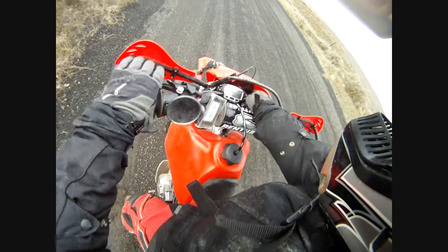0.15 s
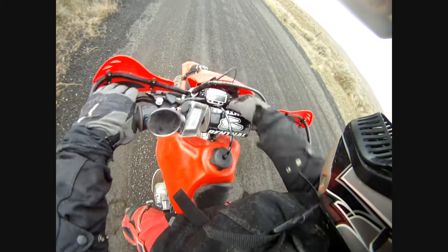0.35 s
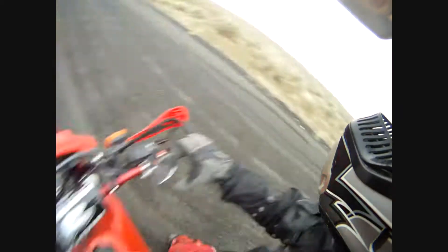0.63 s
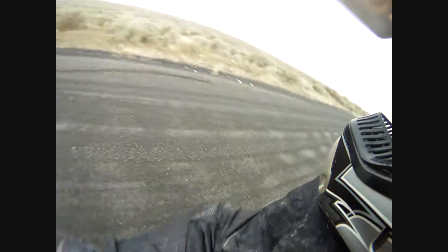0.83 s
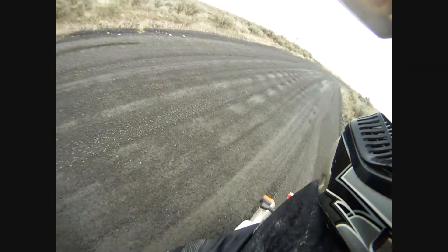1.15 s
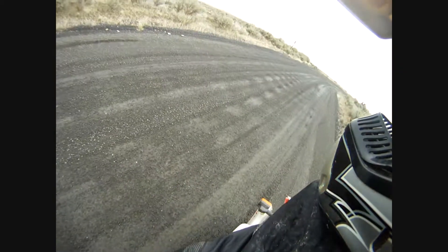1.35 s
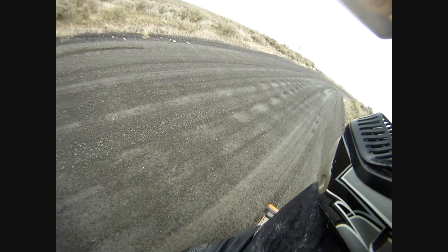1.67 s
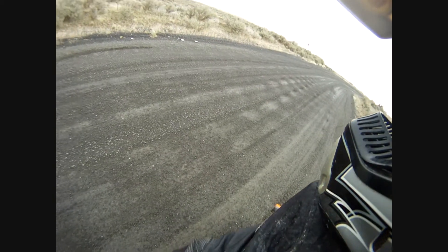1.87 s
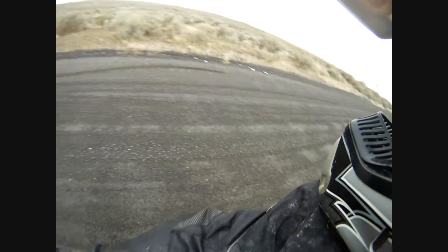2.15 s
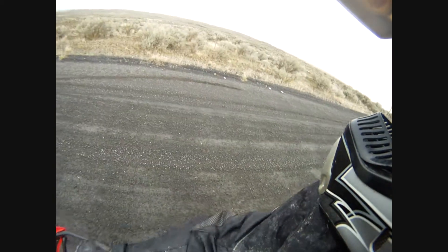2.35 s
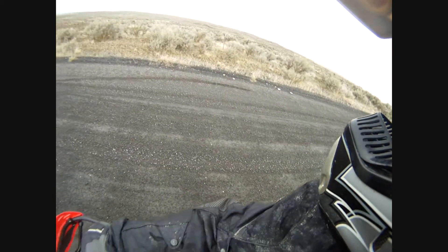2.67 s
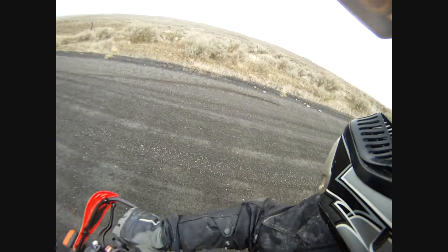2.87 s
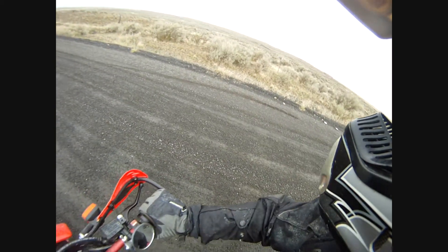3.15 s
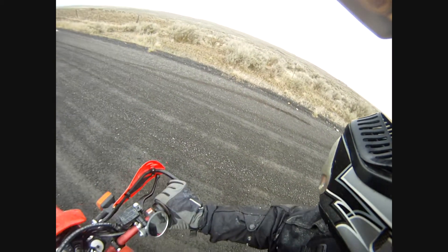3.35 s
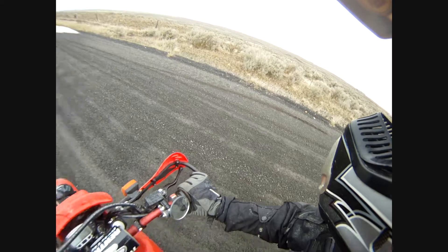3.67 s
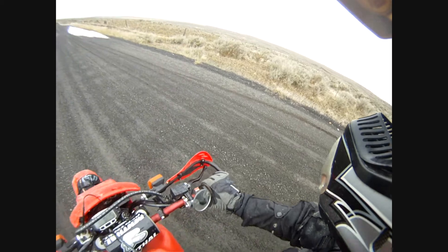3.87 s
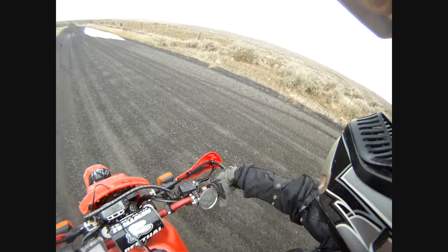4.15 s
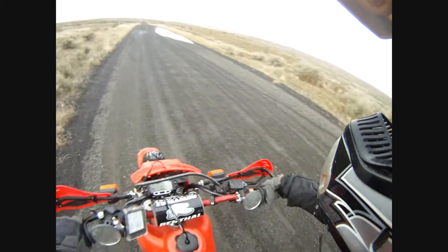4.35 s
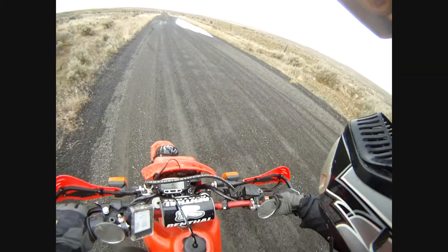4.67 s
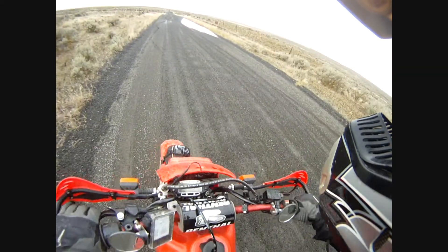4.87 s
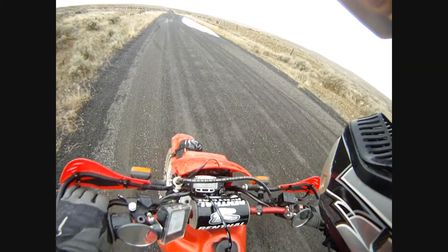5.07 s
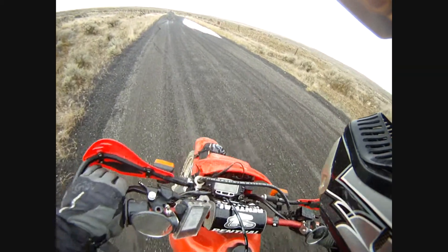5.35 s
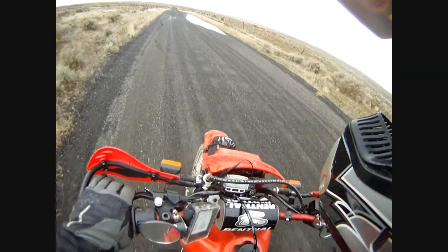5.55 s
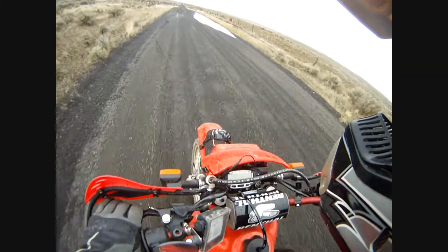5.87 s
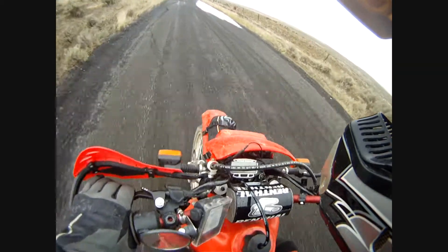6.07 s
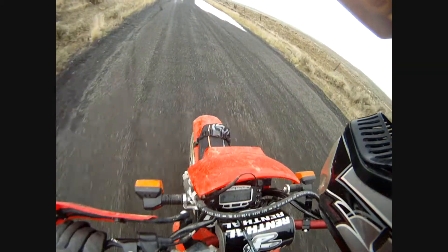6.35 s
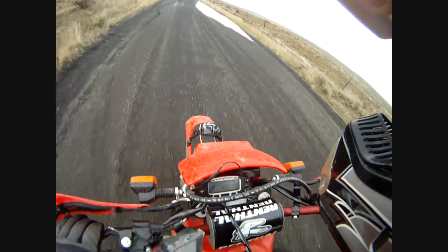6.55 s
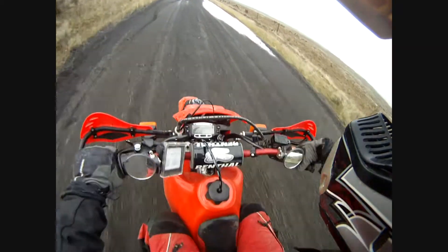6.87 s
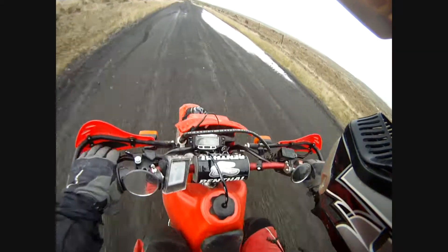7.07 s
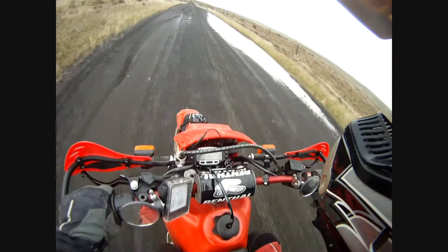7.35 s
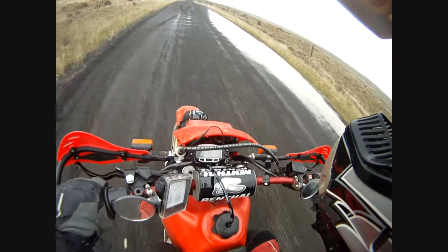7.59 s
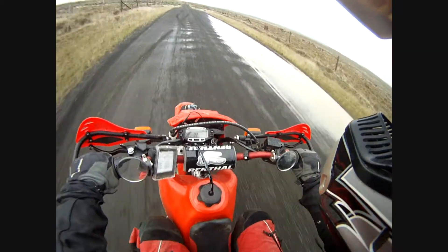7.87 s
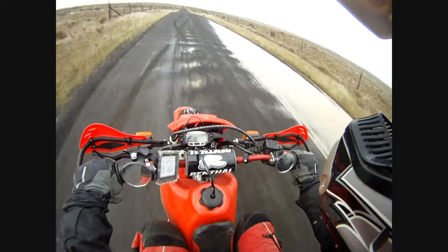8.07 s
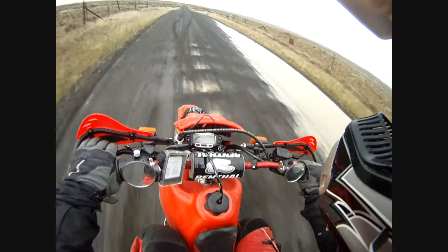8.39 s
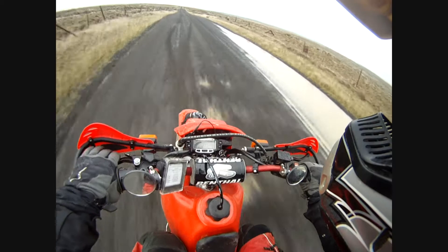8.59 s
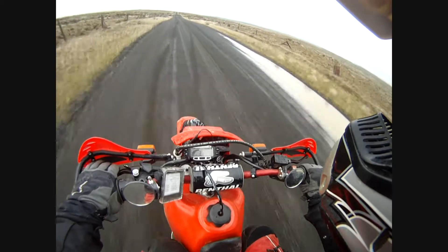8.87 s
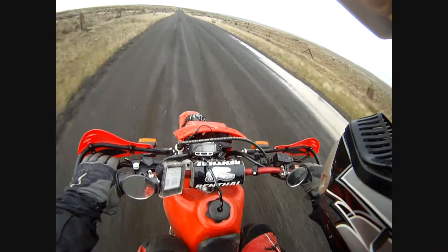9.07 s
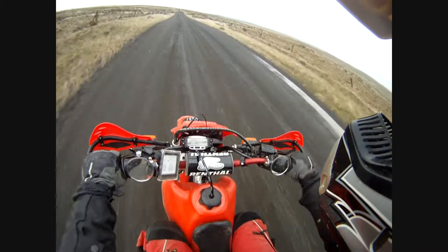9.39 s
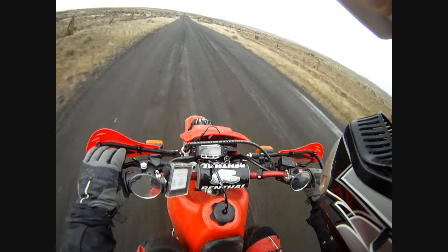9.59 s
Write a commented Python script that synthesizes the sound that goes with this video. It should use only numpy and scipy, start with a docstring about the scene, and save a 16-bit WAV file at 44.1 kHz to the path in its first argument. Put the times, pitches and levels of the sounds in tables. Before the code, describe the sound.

Clothing rustles and wind buffets until a single-cylinder motorcycle engine catches, sputters and pulls away, shifting up twice.

```python
"""A single-cylinder four-stroke dirt bike on a gravel road, close up from a camera on the rider's helmet.
It coasts with a dead engine: wind buffets the microphone's case, the rider's gear rustles and knocks.
Near 4 s the engine catches and sputters, then pulls away and changes up twice as the tyres begin to roar.
Each cycle gives an exhaust thump that barks under throttle, a gulp of intake air and a rush of gas,
over a steady clatter."""
import sys
import numpy as np
from scipy import signal
from scipy.fft import rfft, irfft, next_fast_len
from scipy.io import wavfile
from scipy.ndimage import uniform_filter1d

SR = 44100
rng = np.random.default_rng(int(sys.argv[2]) if len(sys.argv) > 2 else 0)


def int16_out(signal):
    """Quantize to a 16-bit WAV file."""
    q = np.round(np.clip(np.atleast_2d(signal).T, -1, 1) * 32767)
    wavfile.write(sys.argv[1], SR, q.astype(np.int16))


N = 429093
TIME = np.arange(N) / SR

# speed of the running engine: time_s, firing_hz
FIRING_RATE = [(5.0084, 21.47), (5.2, 26.97), (5.49, 27.35), (5.69, 26.45), (6.25, 32.31), (6.42, 37.59),
               (6.77, 56.7), (6.88, 47.23), (7.14, 39.06), (7.19, 34.0), (7.3, 32.36), (7.72, 43.57),
               (8.39, 50.27), (8.87, 52.42), (9.05, 55.49), (9.33, 53.95), (9.4, 49.18), (9.73, 45.99)]
# short dying runs as the engine catches: start_s, end_s, firing_hz, first_level_db, loss_per_firing_db
CATCHES = [(3.929, 3.96, 14, -34.5, 2), (4.0195, 4.14, 19.4, -17.5, 2.0), (4.169, 4.45, 19.9, -28.5, 1.9),
           (4.491, 4.72, 15, -35, 0), (4.797, 4.99, 23.6, -15.5, 3.2)]
# sleeve strokes with a gliding pitch: start_s, length_s, level_db, start_hz, end_hz
SWISHES = [(0.481, 0.019, -56.5, 1900, 2040), (1.324, 0.081, -58, 2290, 2900),
           (1.604, 0.074, -51, 2410, 2890), (1.768, 0.072, -48.5, 3070, 2040),
           (2.531, 0.059, -44.5, 1930, 1500), (3.287, 0.1183, -54, 1297, 1397),
           (3.41, 0.209, -51.5, 1398, 1517), (3.649, 0.099, -51, 1450, 1484),
           (3.82, 0.099, -48.5, 1590, 1305)]
# midrange spectrum of gas, clatter and tyres: frequency_hz, level_db
RUSH_SPECTRUM = [(100, -8.5), (350, -1.5), (700, -8.5), (1100, -2), (2000, -2.5), (2700, -3), (4000, -15.5),
                 (5500, -9), (8000, -15.5)]
# spectrum of hiss at the camera case: frequency_hz, level_db
HISS_SPECTRUM = [(1500, -27), (3500, -5), (5000, 1), (7500, -43), (9000, 25), (11000, 19), (13500, -58),
                 (15500, -21)]


def firings():
    """Times in seconds at which the running engine completes a cycle."""
    time_s, firing_hz = np.transpose(FIRING_RATE)
    running_s = TIME[TIME >= time_s[0]]
    cycles = np.cumsum(np.interp(running_s, time_s, firing_hz)) / SR
    return np.interp(np.arange(int(cycles[-1]) + 1), cycles, running_s)


def octaves_over_cruise(cruise_hz=50):
    """Engine speed from the first catch on, in doublings of the cruising firing rate."""
    speed = [(start, rate) for start, _, rate, _, _ in CATCHES] + list(FIRING_RATE)
    return np.log2(curve(speed) / cruise_hz)


def engine_gain(law, throttle):
    """Each part of the engine's sound grows with speed and load."""
    cruise_db, per_octave_db, shut_loss_db = law
    return from_db(cruise_db + per_octave_db * octaves_over_cruise() - shut_loss_db * (1 - throttle))


def pipe(x, echo_db, round_trip_s=0.00337):
    """Whatever leaves the exhaust comes again after one round trip in the pipe."""
    return x + from_db(echo_db) * np.interp(TIME - round_trip_s, TIME, x, left=0)


def thump(pulses, low_hz=120, top_hz=640):
    """The blow-down of the cylinder rings the silencer."""
    # silencer resonances: pitch_hz, gain_db, t60_s
    silencer_modes = [(204, 8, 0.012), (292.5, 13.5, 0.021), (390, -12, 0.065), (467, -2, 0.097)]
    ringing = ring(pipe(pulses, echo_db=-4.5), silencer_modes)
    return -cut(cut(ringing, top_hz, "low", order=4), low_hz, "high")


def exhaust_and_intake(fired, throttle, uneven_db=1.3, gulp_lag_s=0.007734, valve_open_s=0.00406):
    """A gulp follows each exhaust thump: the intake valve rings the airbox as it opens and shuts."""
    # airbox resonances: pitch_hz, gain_db, t60_s
    airbox_modes = [(252, -5.5, 0.066), (326, -2.5, 0.025), (520, -15.5, 0.033)]
    # strength of thump and gulp together: cruise_db, per_octave_db, shut_loss_db
    thump_law = (-21, 6.1, 5.2)
    period_s = 1 / np.interp(fired, *np.transpose(FIRING_RATE))
    thump_sizes, gulp_sizes = from_db(-uneven_db * rng.standard_normal((len(fired), 2))).T
    exhaust = levelled(thump(clicks(fired, thump_sizes)))
    opens_s = fired + gulp_lag_s + 0.2076 * period_s
    gulps = clicks(opens_s, gulp_sizes) + clicks(opens_s + valve_open_s, from_db(-6) * gulp_sizes)
    intake = levelled(cut(cut(ring(gulps, airbox_modes), 660, "low"), 106, "high"))
    return engine_gain(thump_law, throttle) * levelled(exhaust + from_db(-2) * throttle ** 1.9 * intake)


def bark_and_puff(fired, throttle, lag_s=0.0008, jitter_s=0.00003, uneven_db=0.32):
    """Under load the exhaust pulse steepens to a crack; a puff of gas follows it down the pipe."""
    # exhaust resonances rung by the crack: pitch_hz, gain_db, t60_s
    bark_modes = [(460, 3.5, 0.054), (835, -13.5, 0.075), (1102, 4.5, 0.023), (1140, 0, 0.017),
                  (1546, -1, 0.016), (1780, -30, 0.006), (1894, 1, 0.018), (2480, -27, 0.028)]
    # strength of the bark and of the puff: cruise_db, per_octave_db, shut_loss_db
    bark_law = (-20.5, 8, 30.3)
    puff_law = (-25.5, 7, 20.4)
    timing, strength = rng.standard_normal((len(fired), 2)).T
    fronts = clicks(fired + lag_s + jitter_s * timing, from_db(uneven_db * strength))
    bark = levelled(-cut(ring(pipe(fronts, echo_db=5), bark_modes), 184, "high"))
    gas_flow = cut(fade(fronts, t60_s=0.079), 500, "low")
    puff = levelled(pipe(gas_flow * noise(RUSH_SPECTRUM), echo_db=-5.5))
    return engine_gain(bark_law, throttle) * bark + engine_gain(puff_law, throttle) * puff


def crank(fired, throttle, lag_s=0.0035):
    """The piston pumps the air once a crank turn, twice a cycle."""
    # strength of the hum: cruise_db, per_octave_db, shut_loss_db
    crank_law = (-31, 8.5, 17.6)
    firing_hz = curve(FIRING_RATE)
    running = TIME >= fired[0]
    cycle_angle = 2 * np.pi * (np.cumsum(firing_hz * running) / SR - firing_hz * lag_s)
    hum = np.cos(2 * cycle_angle) + from_db(-12) * np.cos(cycle_angle)
    return running * np.sqrt(2) * hum * engine_gain(crank_law, throttle)


def sputter(pop_db=-3.5, chug_db=-10, spit_db=-14):
    """Lone firings as the engine catches; the whole pipe chugs low, and the strong ones spit gas."""
    # low pipe resonances: pitch_hz, gain_db, t60_s
    chug_modes = [(86.7, -1, 0.13), (138, -6, 0.046), (229, -0.5, 0.084), (290, 2, 0.16)]
    fired, level_db = np.transpose([(at, first_db - k * loss_db)
                                    for start, end, rate, first_db, loss_db in CATCHES
                                    for k, at in enumerate(np.arange(start, end, 1 / rate))])
    relative_db = level_db - level_db.max()
    thump_peak = np.abs(thump(clicks([0], [1.]))).max()
    pops = thump(clicks(fired, from_db(level_db)), low_hz=113, top_hz=450) / thump_peak
    pushes = clicks(fired, from_db(level_db.max() + 0.46 * relative_db))
    chug = cut(cut(ring(pushes, chug_modes), 440, "low"), 63, "high")
    spurts = clicks(fired, from_db(level_db + 0.94 * relative_db))
    spit = cut(fade(spurts, t60_s=0.099), 140, "low") * noise(RUSH_SPECTRUM)
    return from_db(pop_db) * pops - from_db(chug_db) * chug + from_db(spit_db) * spit


def clatter_and_tyres():
    """One fluttering rush carries the engine's ringing metal and the roar of tyres on wet gravel."""
    # tyre roar as the bike gathers speed: time_s, level_db
    tyre_roar = [(3.9, -55), (6.0, -47), (7.2, -44), (8.3, -32.5), (9.73, -26.5)]
    casing = levelled(ring(rng.standard_normal(N), [(1466, -4.5, 0.031), (1870, 3.5, 0.021)]))
    rush = levelled(noise(RUSH_SPECTRUM) + from_db(-19) * noise(HISS_SPECTRUM) + from_db(-5) * casing)
    flutter = from_db(1.54 * drift(rate_hz=100))
    clatter_db = -28.5 + 18 * octaves_over_cruise()  # follows engine speed, whatever the load
    return np.hypot(from_db(clatter_db), from_db(curve(tyre_roar))) * rush * flutter


def wind(rumble_db=-2.5, buffet_db=-13, gust_db=-1.5):
    """A lumpy rumble on the microphone's case, with higher buffeting that jumps in the gusts."""
    # airflow over the case: time_s, level_db
    airflow = [(0, -48), (.6, -51.5), (.8, -44), (2.05, -47.5), (2.23, -35), (2.45, -51), (3.15, -49),
               (3.3, -63), (4.3, -41.5), (5.5, -45.5), (7.0, -37), (9.73, -36)]
    # gusts on the case, plus the low thud under the knocks at 1.87 s and 2.17 s: start_s, length_s, level_db
    gusts = [(0.052, 0.063, -47), (0.815, .1, -51), (0.993, 0.174, -45.5), (1.21, 0.11, -50),
             (1.478, .14, -56), (1.722, 0.071, -50), (1.866, 0.022, -35), (1.958, 0.067, -46.5),
             (2.167, 0.027, -35.5), (2.24, 0.096, -46), (2.405, 0.044, -51)]
    # spectra of the rumble and the buffeting: frequency_hz, level_db
    rumble_spectrum = [(12, 3.5), (28, -2), (42, 2.5), (70, -19), (150, -25), (400, -29)]
    buffet_spectrum = [(30, -49), (65, 4.5), (110, -5.5), (200, -10.5), (400, -20), (900, -24)]
    flow = from_db(curve(airflow) - drift(rate_hz=2.4))
    buffeting = np.hypot(from_db(buffet_db) * flow, from_db(gust_db) * swells(gusts))
    return from_db(rumble_db) * flow * noise(rumble_spectrum) + buffeting * noise(buffet_spectrum)


def gear_knocks(gain_db=-7):
    """Knocks ring the helmet shell under the microphone; ticks and scuffs are short bright bursts."""
    # dull knocks on the helmet: start_s, level_db
    knocks = [(0.068, -28), (.652, -22.5), (1.874, -44), (2.18, -37), (2.291, -30)]
    # shell resonances: pitch_hz, gain_db, t60_s
    helmet_modes = [(130, -6, 0.062), (229, -7, 0.034), (417, -4.5, 0.097), (865, -7, 0.034),
                    (1230, 3, 0.011), (1870, -9, 0.019)]
    # ticks and scuffs of the rider's gear: start_s, level_db, t60_s
    ticks = [(0.652, -33, 0.0093), (.731, -15, 0.017), (2.538, -31, 0.06), (2.995, -47, 0.066),
             (4.629, -32.5, 0.069)]
    # their spectrum: frequency_hz, level_db
    tick_spectrum = [(500, -43), (1200, 17.5), (2400, 0), (3600, 7.5), (5500, 3), (8500, 3), (15000, -45)]
    start_s, level_db = np.transpose(knocks)
    shell = ring(clicks(start_s, from_db(level_db)), helmet_modes)
    bursts = sum(fade(clicks([at], [from_db(db)]), t60_s) for at, db, t60_s in ticks)
    return from_db(gain_db) * (shell + bursts * noise(tick_spectrum))


def clothing_rustle():
    """Rubbing on the case sounds hollow, sleeves hiss; a faint rustle of both goes on between strokes."""
    # steady rustle of air and clothing: time_s, level_db
    rustle = [(0, -57), (.35, -59.5), (.75, -60), (.9, -57), (1.9, -52.5), (2.45, -54.5), (2.7, -61),
              (3.2, -63.5), (3.9, -56)]
    # clothing rubs on the case: start_s, length_s, level_db
    rubs = [(0.103, 0.062, -37), (0.18, 0.053, -51.5), (1.071, 0.087, -47), (1.216, .07, -51.5),
            (2.05, 0.27, -50.5)]
    # resonances of the rubbed case: pitch_hz, gain_db, t60_s
    case_modes = [(134, -4, 0.062), (439, -17, 0.52), (810, -28.5, 0.13), (1037, -13, 0.21),
                  (1213, 4.5, 0.017), (1710, 0.5, 0.012), (2104, 3, 0.0088), (3550, 1.5, 0.0094)]
    # spectrum of sliding cloth: frequency_hz, level_db
    cloth_spectrum = [(120, -2), (250, -0.5), (550, 2.5), (750, -4), (1200, 4), (2500, 3.5), (4000, -8),
                      (5400, 1.5), (8000, -9)]
    hollow = cut(ring(rng.standard_normal(N), case_modes), 3200, "low")
    cloth = noise(cloth_spectrum) + from_db(-19) * noise(HISS_SPECTRUM)
    steady = from_db(curve(rustle))
    rubbing = np.hypot(swells(rubs), from_db(-5) * steady)
    swishing = np.hypot(swells(SWISHES), from_db(-3) * steady)
    flutter = from_db(1.45 * drift(rate_hz=55))
    return (rubbing * hollow / hollow.std() + swishing * cloth) * flutter


def sleeves(roughness_hz=130, gain_db=-2.5):
    """Woven cloth sliding on itself sings at a rough pitch that follows its speed."""
    pitch_hz = curve([point for start, length, _, start_hz, end_hz in SWISHES
                      for point in [(start, start_hz), (start + length, end_hz)]])
    tone = np.sin(2 * np.pi * np.cumsum(pitch_hz) / SR)
    rough = cut(rng.standard_normal(N), roughness_hz, "low")
    return from_db(gain_db) * swells(SWISHES) * tone * rough / rough.std()


def from_db(db):
    """Decibels as an amplitude factor."""
    return 10 ** (np.asarray(db) / 20)


def curve(points):
    """Straight lines through (time_s, value) points, sample by sample."""
    return np.interp(TIME, *np.transpose(points))


def swells(strokes, attack_s=0.0081, release_s=0.013):
    """Envelope of gusts, rubs or swishes: each rises, holds and dies away."""
    envelope = np.zeros(N)
    for start_s, length_s, level_db, *_ in strokes:
        age_s = TIME - start_s
        rise = np.clip(age_s / attack_s, 0, 1)
        fall = np.exp(-np.clip((age_s - length_s) / release_s, 0, 20))
        envelope += from_db(level_db) * rise * fall
    return envelope


def levelled(x):
    """Holds the rms near 1 over a few engine cycles."""
    window = SR // 9
    power = uniform_filter1d(uniform_filter1d(x * x, window), window)
    return x / np.sqrt(np.abs(power) + 1e-9)


def drift(rate_hz):
    """A smooth random wander with spread 1."""
    step, settle = 40, 2000
    pole = np.exp(-2 * np.pi * step * rate_hz / SR)
    white = rng.standard_normal(N // step + settle + 2)
    slow = signal.lfilter([1], [1, -2 * pole, pole * pole], white)[settle:]
    return np.interp(np.arange(N) / step, np.arange(len(slow)), slow / slow.std())


def noise(spectrum):
    """Noise of rms 1 with the given spectrum, rolling off around its last point."""
    hz, db = np.transpose(spectrum)
    size = next_fast_len(N)
    bin_hz = np.arange(size // 2 + 1) * SR / size
    gain = from_db(np.interp(np.log(bin_hz + 1), np.log(hz), db)) / np.sqrt(1 + (bin_hz / hz[-1]) ** 4)
    coloured = irfft(rfft(rng.standard_normal(size)) * gain, size)[:N]
    return coloured / coloured.std()


def clicks(times_s, sizes):
    """One impulse at each time."""
    samples = np.clip(np.asarray(times_s) * SR, 0, N).astype(int)
    return np.bincount(samples, sizes, N + 1)[:N] + 1e-18


def ring(x, modes):
    """An impulse starts each mode (pitch_hz, gain_db, t60_s) as a damped sine."""
    ringing = 0
    for pitch_hz, gain_db, t60_s in modes:
        radius, angle = from_db(-60 / (t60_s * SR)), 2 * np.pi * pitch_hz / SR
        poles = [1, -2 * radius * np.cos(angle), radius * radius]
        ringing += from_db(gain_db) * signal.lfilter([0, np.sin(angle)], poles, x)
    return ringing


def fade(x, t60_s):
    """Gives each impulse an exponential tail."""
    return signal.lfilter([1], [1, -from_db(-60 / (t60_s * SR))], x)


def cut(x, hz, kind, order=2):
    """A high- or low-pass filter."""
    return signal.sosfilt(signal.butter(order, hz, kind, fs=SR, output="sos"), x)


def scene():
    """At the helmet, in mono: the rustle of coasting gives way to the engine as it starts to turn."""
    # twist grip, gentle at first, then wide open, shut for each gear change: time_s, opening_fraction
    twist_grip = [(5.0, 0.42), (5.1, 0.59), (5.5, 0.48), (5.85, 0.56), (6.1, 0.72), (6.27, 0.55),
                  (6.4, 0.9), (6.72, 0.99), (6.8, 0.77), (6.84, 0.06), (7.14, 0.15), (7.195, 0.99),
                  (8.2, 1), (9.32, 0.94), (9.37, 0.2), (9.55, 0), (9.61, 0.86), (9.73, 0.96)]
    throttle = np.clip(curve(twist_grip), 0, 1)
    fired = firings()
    turning = np.clip((TIME - 3.88) / 0.08, 0, 1)
    bike = exhaust_and_intake(fired, throttle) + crank(fired, throttle) + sputter()
    bike += turning * (bark_and_puff(fired, throttle) + clatter_and_tyres())
    return (bike + wind() + (1 - turning) * clothing_rustle() + sleeves() + gear_knocks())[None]


def record(dry, hold_hz=12000, cutoff_hz=15500):
    """The case colours the midrange; the camera's sample-and-hold mirrors the low band; the top is cut."""
    # midrange peaks and a dip from the case; a deep 6 kHz notch from the camera's sampling:
    # centre_hz, width_hz, gain_db
    peaks_and_notches = [(1474, 46, 3), (1622, 48, -7.5), (2000, 153, 5), (3570, 250, 3.5),
                         (5940, 767, -24)]
    for centre_hz, width_hz, gain_db in peaks_and_notches:
        root_gain = from_db(gain_db / 2)
        width = np.tan(np.pi * width_hz / SR)
        tuning = -2 * np.cos(2 * np.pi * centre_hz / SR)
        dry = signal.lfilter([1 + width * root_gain, tuning, 1 - width * root_gain],
                             [1 + width / root_gain, tuning, 1 - width / root_gain], dry)
    slope = np.gradient(cut(dry, 7600, "low", order=8), axis=-1) * SR / (2 * np.pi * hold_hz)
    image = 2 * slope * np.cos(2 * np.pi * hold_hz * TIME)  # lies either side of the hold rate
    return signal.sosfilt(signal.ellip(10, 0.2, 80, cutoff_hz, fs=SR, output="sos"), dry + image)


dry = scene()
out = record(dry)
int16_out(out)
```